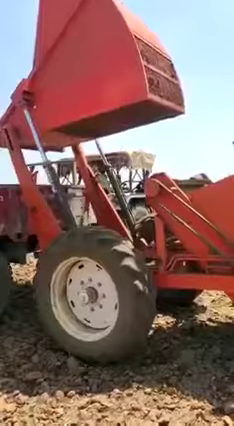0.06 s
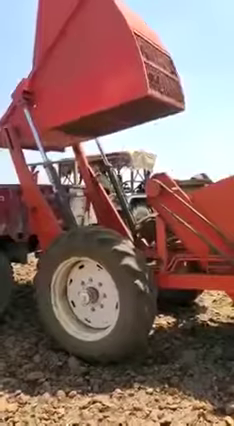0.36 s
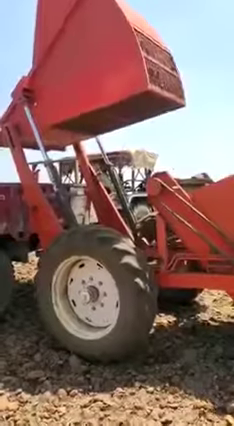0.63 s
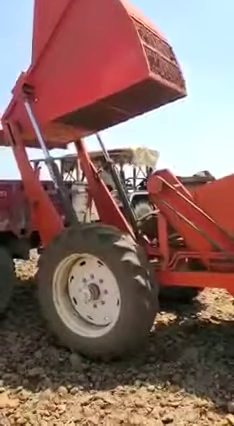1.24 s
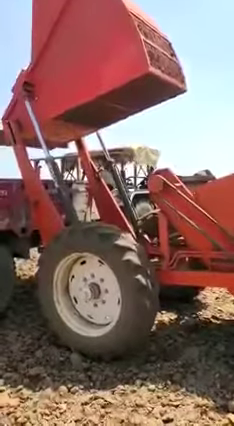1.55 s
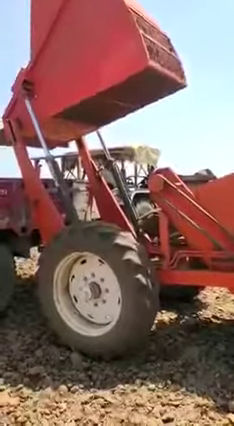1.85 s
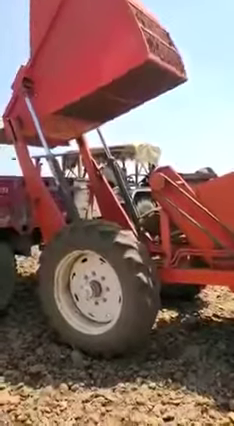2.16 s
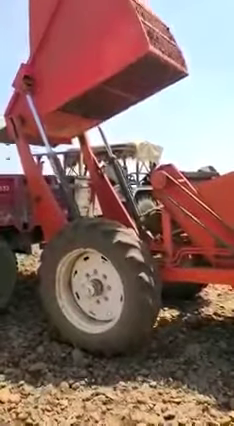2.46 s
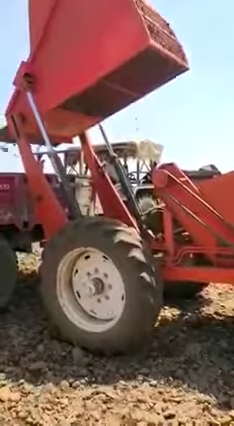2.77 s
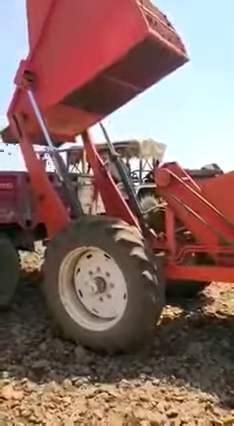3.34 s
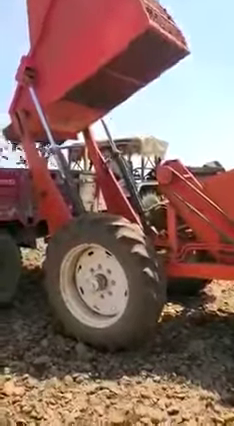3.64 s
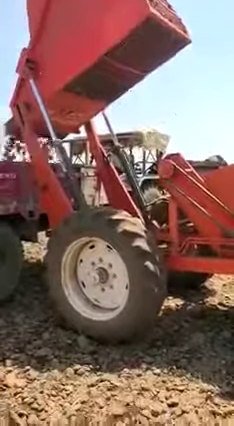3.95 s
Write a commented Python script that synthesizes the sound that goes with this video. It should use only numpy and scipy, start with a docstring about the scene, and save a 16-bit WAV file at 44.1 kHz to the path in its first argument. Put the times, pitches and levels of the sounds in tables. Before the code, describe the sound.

Stones tumble from a tipping steel hopper into a trailer, building to a clattering roar.

```python
"""A tractor idles in an open field while a steel hopper tips its load of stones into a trailer.
First comes a trickle: single stones boom, thud and crack on ringing sheet steel, spills of gravel
scrape down the hopper and pebbles clink. From about 2 s more and more of the gravel lands in the
trailer. Around 3 s three heavy loads set its floor humming, and the stream grows to a clattering roar."""
import sys
import numpy as np
from scipy import signal
from scipy.fft import irfft, next_fast_len
from scipy.io import wavfile

SR = 44100
rng = np.random.default_rng(int(sys.argv[2]) if len(sys.argv) > 2 else 0)


def put_to_file(sound):
    """Save the sound as 16-bit audio at rate SR, in the file named by the first command-line argument."""
    columns = np.atleast_2d(sound).T  # one column per channel
    safe = np.clip(columns, -1, 1)
    whole_steps = np.round(safe * 32767)
    wavfile.write(sys.argv[1], SR, whole_steps.astype(np.int16))


N = 176400

# the engine's idle (t/s, firing rate/Hz)
FIRING_RATE = [(0, 28.85), (1, 29), (2, 29.49), (3, 29.68), (4, 30.1)]
# exhaust tones (multiple of the firing rate, level/dB)
EXHAUST_ORDERS = [(2, -57), (3, -57.5), (4, -50.5), (6, -58), (7, -56.5), (8, -61), (9, -62.5)]
# tone colour of the engine's mechanical noise and of each kind of contact (f/Hz, relative level/dB)
ENGINE_EQ = [(20, -8.5), (60, -1), (130, 7.5), (200, -10), (280, -12.5), (420, -3.5), (640, 9.5), (900, -1),
             (1400, -7), (2000, -7), (3300, -12.5), (4500, -7), (5100, -32), (7700, -25)]
BOOM_EQ = [(40, -45), (95, -17), (150, -17), (195, -6), (255, 4.5), (300, 1.5), (340, 1), (385, -6.5),
           (480, -11), (900, -38), (8000, -72.5)]
THUD_EQ = [(60, -60), (250, -20.5), (400, -12.5), (480, -2.5), (560, 0.5), (700, 1), (850, -5),
           (1300, -15.5), (3000, -47), (8000, -66.5)]
CRACK_EQ = [(200, -27), (600, -17.5), (1000, 3.5), (1450, -5.5), (1900, 0.5), (2800, -1.5), (3600, -5),
            (4500, -10), (5100, -11), (8000, -22.5)]
SCRAPE_EQ = [(300, -26.5), (1200, -1.5), (2500, 5.5), (3600, 4.5), (4400, 10), (5000, -0.5), (6200, -2),
             (7300, -0.5), (8000, -13.5)]
TICK_EQ = [(300, -24.5), (1200, 7), (2500, 5), (3500, 7.5), (4400, 2.5), (5200, 3), (6200, 3), (7300, 8),
           (8000, -1.5)]
# panning of the engine, the stones and the sliding gravel (f/Hz, left minus right/dB)
ENGINE_PAN = [(130, 2.5), (280, 4.5), (400, -20), (520, -9), (700, 27), (950, -12), (1400, 1), (3200, 15),
              (4300, 4.5), (5500, -7), (6900, -19)]
STONE_PAN = [(260, -3), (500, -0.5), (700, 1.5), (1400, -1.5), (2100, 2), (3200, 4.5), (4300, 1),
             (5500, -1), (7000, -9.5)]
SCRAPE_PAN = [(1400, 2), (2100, -0.5), (3200, 17), (4300, -1.5), (5500, 1), (6900, -42)]
# likeness of the two ears (f/Hz, correlation)
EAR_LIKENESS = [(50, .97), (130, .995), (280, .97), (650, .94), (900, .64), (2100, .56), (3000, .28),
                (4100, -.1), (8000, .05)]
# modes of the steel walls (f/Hz, relative level/dB, t60/s)
WALL_MODES = [(262.5, -3, 0.062), (272, 2.5, 0.14), (301.4, -7.5, 0.5), (380, 2, 0.3), (420, 7, 0.15),
              (556, -6, 0.36), (664, 0, 0.26), (729, 0.5, 0.22), (1851, 2, 0.23), (2330, -9, 0.28),
              (2930, -9, 0.22), (3050, 4, 0.047), (3640, 4.5, 0.064), (4200, -2.5, 0.11), (5400, 0, 0.035),
              (5820, -0.5, 0.16)]
# faders of the stream of stones, before trims (t/s, boom level/dB, thud level/dB, clatter level/dB)
STREAM_FADERS = [(0, -39, -38, -37), (.25, -63, -47, -41.5), (.33, -57, -54, -41.5), (.55, -64, -45, -40),
                 (.63, -42, -54, -51), (.95, -28, -40, -39.5), (1.1, -36.5, -35.5, -38),
                 (1.35, -34.5, -34.5, -40), (1.52, -41, -47, -42.5), (1.6, -32.5, -35.5, -38.5),
                 (1.75, -32.5, -36.5, -38.5), (2, -30, -30, -34), (2.33, -28, -30.5, -31),
                 (2.6, -23.5, -25.5, -25), (2.8, -27.5, -24.5, -31.5), (2.87, -22.5, -17, -31),
                 (2.98, -24, -23, -24), (3.08, -18.5, -17, -21.5), (3.2, -22.5, -18, -17),
                 (3.245, -15, -25, -27), (3.3, -22, -16, -21), (3.41, -19, -20, -22.5),
                 (3.6, -21.5, -15, -19), (3.85, -16, -16, -16.5), (4, -17, -10, -13.5)]
# gravel spilling down the hopper (t/s, length/s, level/dB)
GRAVEL_SPILLS = [(0.194, 0.017, -48), (.46, 0.066, -47), (0.523, 0.12, -42), (0.72, 0.038, -37.5),
                 (0.845, 0.059, -36), (0.973, 0.023, -28), (1.056, 0.064, -30.5), (1.217, 0.025, -31.5),
                 (1.308, 0.023, -34), (1.429, 0.024, -34), (1.566, 0.12, -37), (1.783, 0.06, -33),
                 (1.963, 0.17, -38), (2.075, 0.13, -33), (2.224, 0.11, -33.5), (2.355, 0.065, -27),
                 (2.53, 0.024, -19.5), (2.606, 0.22, -27.5), (2.65, 0.026, -22), (2.983, .16, -22),
                 (3.163, 0.036, -17.5), (3.248, 0.077, -22.5), (3.425, 0.042, -14.5), (3.475, 0.053, -18),
                 (3.606, 0.023, -16), (3.67, .18, -16.5), (3.843, 0.21, -20.5)]
# big stones on steel, before trims (t/s, boom level/dB, thud level/dB, crack level/dB, tumble/s)
STONE_HITS = [(0.134, -47, -31, -35.5, 0.0053), (0.205, -26, -24, -30, 0.0029),
              (0.219, -22, -40, -47, 0.0057), (0.599, -24.5, -28, -35, 0.0032),
              (0.657, -22, -41, -34, 0.01), (0.683, -35, -37, -34, 0.0085),
              (0.723, -43, -27.5, -36, 0.0074), (0.766, -21.5, -30.5, -32, 0.024),
              (0.861, -24.5, -44, -33.5, 0.0096), (0.904, -28, -52, -35, 0.0094),
              (0.993, -21, -16.5, -19.5, 0.007), (1.012, -15, -15.5, -18.5, 0.0078),
              (1.072, -24.5, -20.5, -36, 0.013), (1.095, -25, -23.5, -35, 0.018),
              (1.24, -22.5, -24, -28, 0.028), (1.431, -22.5, -35.5, -32, 0.004),
              (1.622, -27, -26, -30.5, 0.0059), (1.682, -21.5, -42, -31, 0.011),
              (1.814, -44, -25.5, -27.5, 0.029), (1.896, -25.5, -27.5, -33.5, 0.018),
              (1.976, -18.5, -32, -34, 0.026), (2.123, -46, -24.5, -41, 0.012),
              (2.254, -47.5, -23.5, -26.5, 0.029), (2.382, -16, -13, -15, 0.011),
              (2.554, -14, -13, -17, 0.011), (2.613, -38, -16, -21.5, 0.0151),
              (2.689, -21, -20, -18.5, 0.0083), (2.773, -20, -22, -38, 0.0043),
              (2.815, -19, -5, -13, 0.0069), (2.831, -9, -13, -25, 0.0033), (3.028, -17, -12, -10, 0.013),
              (3.124, -28, -16, -14, 0.013), (3.263, -38, -7, -12, 0.011),
              (3.344, -20.5, -19, -15.5, 0.012), (3.523, -9, -7.5, -14, 0.012),
              (3.68, -17, -16, -11.5, 0.0065), (3.829, -9, -9, -12, 0.013), (3.871, -15, -16, -36, 0.021),
              (3.938, -11, -23, -14.5, 0.0087)]
# sharp single pebbles (t/s, level/dB, clink f/Hz)
PEBBLE_HITS = [(0.207, -31, 2900), (0.464, -41, 4400), (.565, -33, 6100), (0.6, -33.5, 4260),
               (.795, -35.5, 4200), (.989, -24, 3050), (1.428, -31, 4200), (1.625, -36.5, 2250),
               (1.805, -37, 4080), (2.105, -25, 4220), (3.002, -33, 2640), (3.077, -19.5, 7200),
               (3.433, -19.5, 6770), (3.615, -30, 3960)]
# heavy loads landing on the trailer floor (t/s, level/dB)
FLOOR_HITS = [(2.831, -14.5), (3.03, -22), (3.262, -25)]
# modes of the trailer floor (f/Hz, relative level/dB, t60/s)
FLOOR_MODES = [(382, 0, .8), (421, -6, .45)]

# contact envelopes (burst t60/s, tail level/dB, tail t60/s)
BOOM_DECAY, THUD_DECAY = (0.03, -9.5, 0.21), (0.016, -7.5, 0.25)
CRACK_DECAY, GRIT_DECAY = (0.009, -10.5, 0.25), (0.0022, -3, 0.12)
# gravel crossfades from scraping in the hopper to landing in the trailer
LANDING_FROM_S, LANDING_FULL_S = 2.12, 3.07


def amp(db):
    """Decibels to gain."""
    return 10 ** (np.asarray(db) / 20)


def unit_rms(x):
    """Scales to rms 1."""
    return x / np.sqrt(np.mean(x ** 2) + 1e-20)


def at_hz(table, hz):
    """Reads a table on a log-frequency axis."""
    f, value = np.transpose(table)
    return np.interp(np.log(hz + 1), np.log(f + 1), value)


def automation(table, column):
    """One column of a time table, at every sample."""
    rows = np.array(table)
    return np.interp(np.arange(N) / SR, rows[:, 0], rows[:, column])


def add(mix, start_s, sound):
    """Mixes a sound in at a time."""
    part = mix[:, max(round(start_s * SR), 0):][:, :sound.shape[1]]
    part += sound[:, :part.shape[1]]


def eq_and_pan(pair, eq, pan):
    """Gives two unrelated signals a minimum-phase EQ and their place between the ears, at rms 1."""
    n = pair.shape[1]
    size = next_fast_len(n + 4096)
    hz = abs(np.fft.fftfreq(size, 1 / SR))
    colour = np.exp(np.conj(signal.hilbert(np.log(amp(at_hz(eq, hz))))))
    likeness = np.clip(at_hz(EAR_LIKENESS, hz), -1, 1)
    lean = amp(at_hz(pan, hz) / 2)
    mid, side = np.fft.fft(pair, size) * np.sqrt([1 + likeness, 1 - likeness])
    ears = np.array([(mid + side) * lean, (mid - side) / lean]) / np.hypot(lean, 1 / lean)
    return unit_rms(np.fft.ifft(colour * ears).real[:, :n])


def waver(depth=0.5, below_hz=8):
    """A slow random drift of strength and phase."""
    noise = rng.standard_normal(N) + 1j * rng.standard_normal(N)
    slow = np.fft.ifft(np.fft.fft(noise) * (abs(np.fft.fftfreq(N, 1 / SR)) < below_hz))
    return 1 + depth * slow / slow.std()


def tractor(noise_db=-40.5, throb=0.4):
    """Wavering low exhaust tones under mechanical noise that throbs with each firing."""
    firing_phase = 2 * np.pi * np.cumsum(automation(FIRING_RATE, 1)) / SR
    exhaust = np.zeros(N)
    for order, db in EXHAUST_ORDERS:
        tone = waver() * np.exp(1j * (order * firing_phase + 2 * np.pi * rng.random()))
        exhaust += np.sqrt(2) * amp(db) * tone.real
    rattle = rng.standard_normal((2, N)) * (1 + throb * np.cos(firing_phase))
    return exhaust + amp(noise_db) * eq_and_pan(rattle, ENGINE_EQ, ENGINE_PAN)


def wall_ring(size, trim_db=-32):
    """The steel walls ring with a new mix of their modes at each spot."""
    hz, db, t60 = np.transpose(WALL_MODES)[:, :, None]
    detune_hz = np.fft.rfftfreq(size, 1 / SR) - hz
    modes = amp(trim_db + db) * SR / 2 / (np.log(1000) / t60 + 2j * np.pi * detune_hz)
    return irfft(rng.standard_normal((2, len(WALL_MODES))) @ modes, size)


def contact(eq, decay, pan=STONE_PAN):
    """One contact at a random spot: a short noise burst, its tail in the box and the ringing walls."""
    burst_t60, tail_db, tail_t60 = decay
    t = np.arange(SR // 4) / SR
    envelope = np.hypot(amp(-60 * t / burst_t60), amp(tail_db - 60 * t / tail_t60))
    burst = rng.standard_normal((2, len(t))) * envelope
    return eq_and_pan(burst + wall_ring(len(t)), eq, pan)


def boom():
    """The sheet steel flexes under a stone."""
    return contact(BOOM_EQ, BOOM_DECAY)


def thud():
    """The hollow blow of a stone in the steel box."""
    return contact(THUD_EQ, THUD_DECAY)


def crack():
    """The dry crack of stone against stone."""
    return contact(CRACK_EQ, CRACK_DECAY)


def clack(low_hz=1100, high_hz=4200, clink_t60=0.06):
    """A smaller stone cracks and clinks briefly at three pitches of its own."""
    hit = crack()
    t = np.arange(hit.shape[1]) / SR
    hz = low_hz * (high_hz / low_hz) ** rng.random((3, 1))
    clink = rng.standard_normal((2, 3)) @ np.sin(2 * np.pi * hz * t) * amp(-60 * t / clink_t60)
    return hit + eq_and_pan(clink, CRACK_EQ, STONE_PAN)


def shower(sound, per_s, gain, spread_db, spots):
    """Contacts of random size at random moments, on several spots that each have their own ring."""
    strength = amp(spread_db * np.minimum(rng.exponential(1, N), 3)) * rng.choice([-1, 1], N)
    lands = rng.random(N) < per_s / SR
    impacts = gain * unit_rms(strength * lands / np.sqrt(per_s))
    spot = rng.integers(0, spots, N)
    out = np.zeros((2, N))
    for k in range(spots):
        ring = sound()
        ring *= np.sqrt(2) / np.linalg.norm(ring)
        out += signal.oaconvolve((impacts * (spot == k))[None], ring, axes=1)[:, :N]
    return out


def stone_stream(boom_trim_db=-4, clack_trim_db=-3.5):
    """Ever more stones tumble as the hopper tilts."""
    per_s = np.geomspace(100, 400, N)
    boom_db, thud_db, clatter_db = (automation(STREAM_FADERS, column) for column in (1, 2, 3))
    booms = shower(boom, per_s, amp(boom_db + boom_trim_db), spread_db=2, spots=10)
    thuds = shower(thud, per_s, amp(thud_db), spread_db=2, spots=10)
    clacks = shower(clack, 1.2 * per_s, amp(clatter_db + clack_trim_db), spread_db=3.7, spots=24)
    return booms + thuds + clacks


def scrape():
    """A piece of gravel slipping in the hopper."""
    return contact(SCRAPE_EQ, GRIT_DECAY, SCRAPE_PAN)


def gravel(grains_per_s=600, trickle_trim_db=-6.5, attack_s=0.014, release_s=0.016):
    """Gravel trickles with the stream's clatter and breaks loose in spills, first sliding, then landing."""
    t = np.arange(N) / SR
    power = amp(automation(STREAM_FADERS, 3) + trickle_trim_db) ** 2
    for start_s, length_s, db in GRAVEL_SPILLS:
        attack = np.clip((t - start_s) / attack_s, 0, 1)
        release = np.exp(-np.maximum(t - start_s - length_s, 0) / release_s)
        power += (amp(db) * attack * release) ** 2
    landed = np.interp(t, [LANDING_FROM_S, LANDING_FULL_S], [0, 1])
    sliding = shower(scrape, grains_per_s, np.sqrt(power * (1 - landed)), spread_db=4, spots=4)
    landing = shower(tick, grains_per_s, np.sqrt(power * landed), spread_db=4, spots=4)
    return sliding + landing


def knock(sound, db, tumble_s, bounces_per_s=500, bounce_gain=0.56):
    """A big stone lands and rattles briefly against its neighbours."""
    t = np.arange(SR // 10) / SR
    hits = bounce_gain * rng.standard_normal(len(t)) * (rng.random(len(t)) < bounces_per_s / SR)
    hits *= np.exp(-t / tumble_s)
    hits[0] = 1  # the landing itself
    out = signal.fftconvolve(hits[None], sound(), axes=1)
    return amp(db) * out / out[:, :SR // 40].std()  # the first 25 ms set the level


def big_stones(boom_trim_db=-9, thud_trim_db=-4, crack_trim_db=-3.5):
    """Each big stone booms, thuds and cracks; the longer the tumble, the softer the attack."""
    out = np.zeros((2, N))
    for start_s, boom_db, thud_db, crack_db, tumble_s in STONE_HITS:
        blow = knock(boom, boom_db + boom_trim_db, tumble_s)
        blow += knock(thud, thud_db + thud_trim_db, tumble_s)
        blow += knock(crack, crack_db + crack_trim_db, tumble_s)
        attack_s = tumble_s / 4
        t = np.arange(blow.shape[1]) / SR
        add(out, start_s - attack_s / 2, blow * (1 - np.exp(-t / attack_s)))
    return out


def pebbles(clink_db=1.5, clink_t60=0.035):
    """A pebble gives one sharp click and clinks at its own pitch."""
    out = np.zeros((2, N))
    for start_s, db, hz in PEBBLE_HITS:
        click = scrape() if start_s < LANDING_FROM_S else tick()
        click /= click[:, :SR // 100].std()
        t = np.arange(click.shape[1]) / SR
        clink = amp(clink_db - 60 * t / clink_t60) * np.sin(2 * np.pi * (hz * t + rng.random((2, 1))))
        add(out, start_s, amp(db) * (click + clink))
    return out


def tick():
    """A piece of gravel landing in the trailer."""
    return contact(TICK_EQ, GRIT_DECAY)


def floor_ring():
    """Heavy loads set the low modes of the trailer floor humming."""
    t = np.arange(SR) / SR
    ring = sum(amp(db - 60 * t / t60) * np.sin(2 * np.pi * hz * t) for hz, db, t60 in FLOOR_MODES)
    out = np.zeros((2, N))
    for start_s, db in FLOOR_HITS:
        add(out, start_s, amp(db) * ring[None])
    return out


def scene():
    """Single hits and the humming floor over a bed of stones, gravel and the idling tractor."""
    return big_stones() + floor_ring() + pebbles() + stone_stream() + gravel() + tractor()


def record(dry, ceiling=0.93, cutoff_hz=7780):
    """Soft clipping rounds the loudest peaks, then a steep low-pass takes off the top."""
    soft = dry / (1 + (dry / ceiling) ** 4) ** (1 / 4)
    lowpass = signal.firwin(601, cutoff_hz, window=("kaiser", 9), fs=SR)
    return signal.oaconvolve(soft, lowpass[None], "same")


dry = scene()
out = record(dry)
put_to_file(out)
```